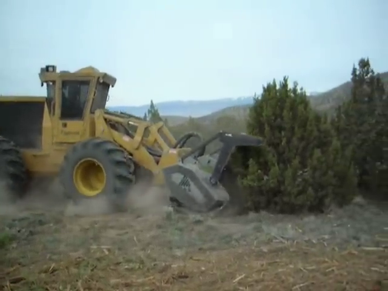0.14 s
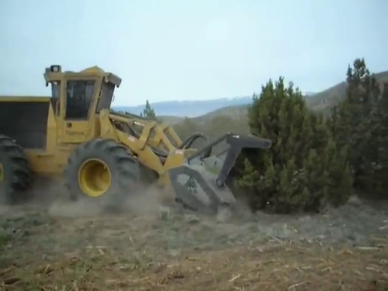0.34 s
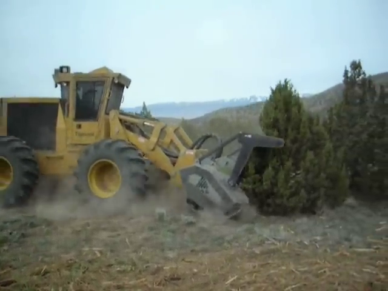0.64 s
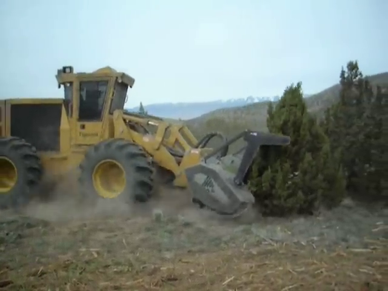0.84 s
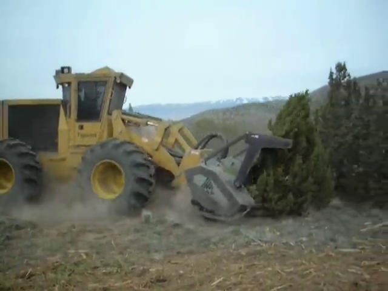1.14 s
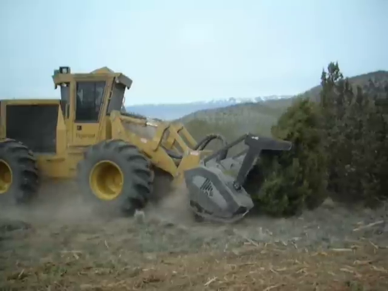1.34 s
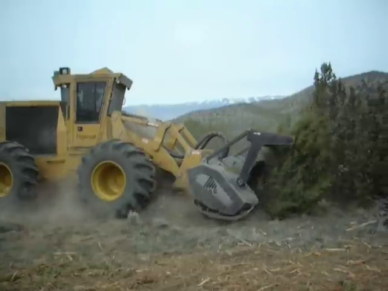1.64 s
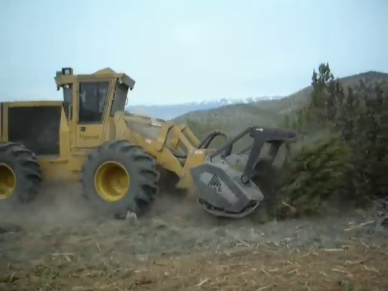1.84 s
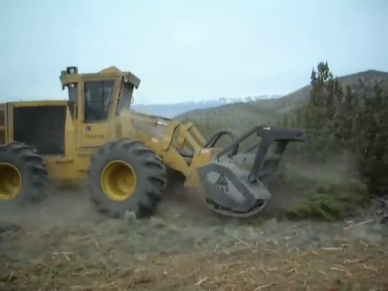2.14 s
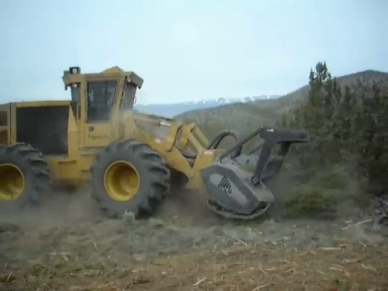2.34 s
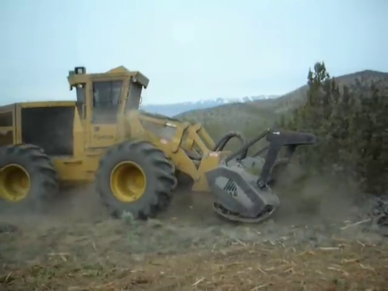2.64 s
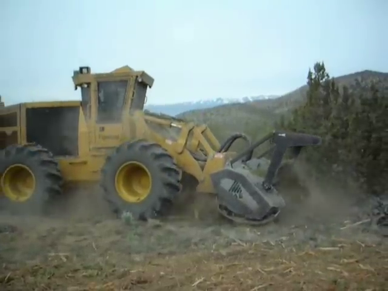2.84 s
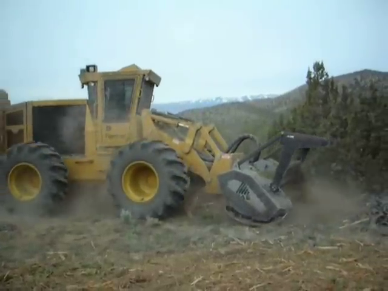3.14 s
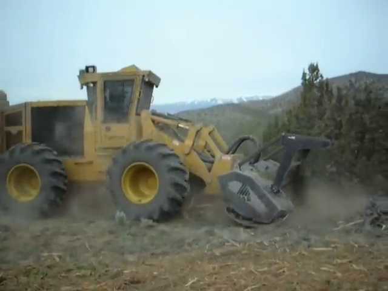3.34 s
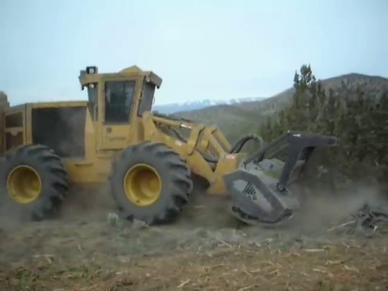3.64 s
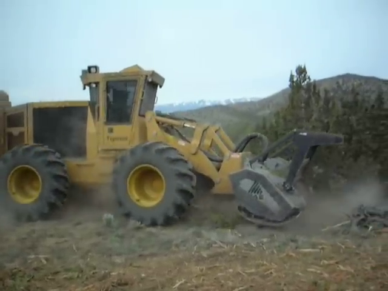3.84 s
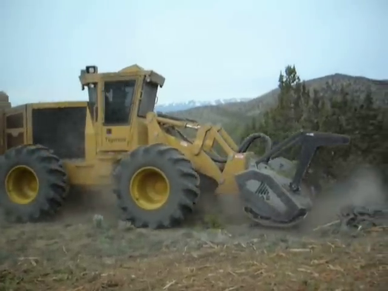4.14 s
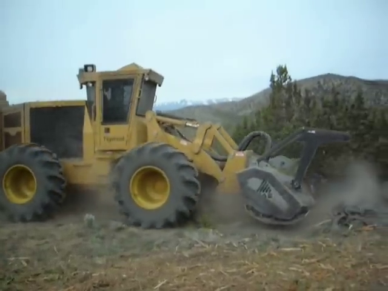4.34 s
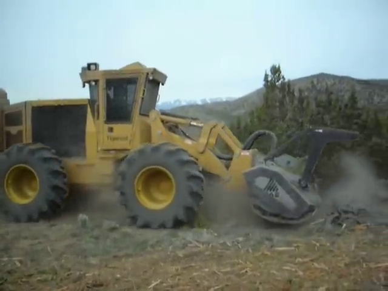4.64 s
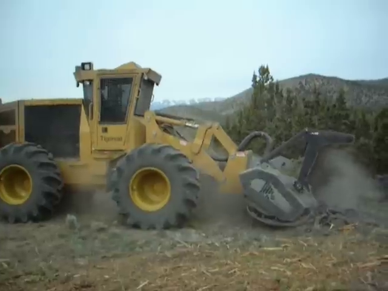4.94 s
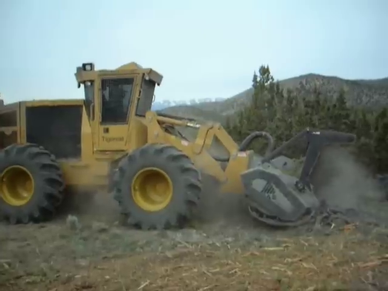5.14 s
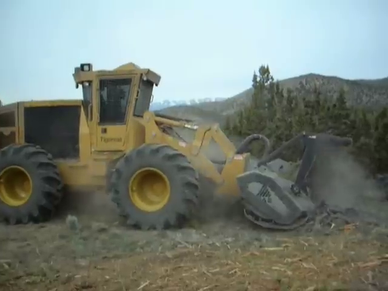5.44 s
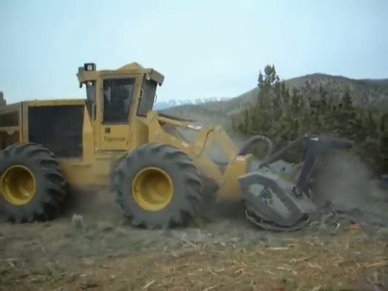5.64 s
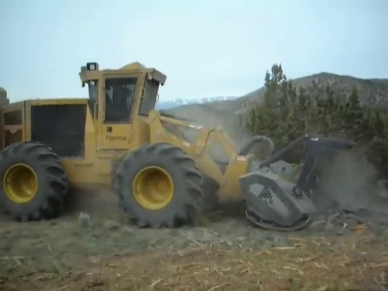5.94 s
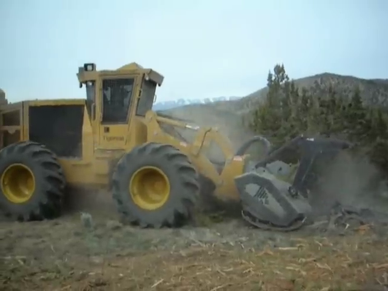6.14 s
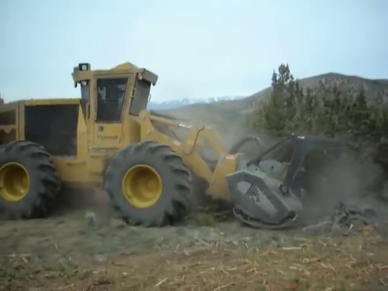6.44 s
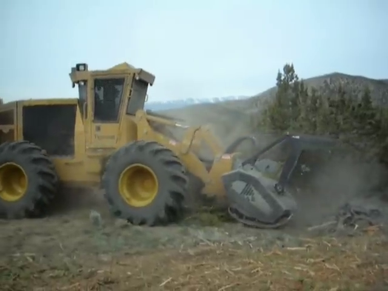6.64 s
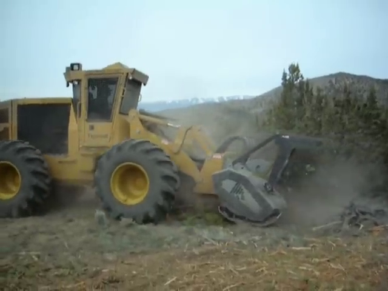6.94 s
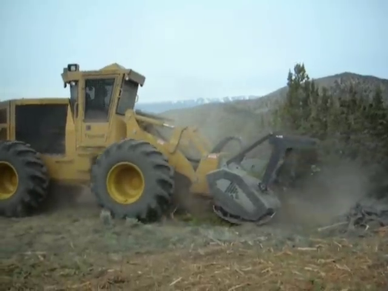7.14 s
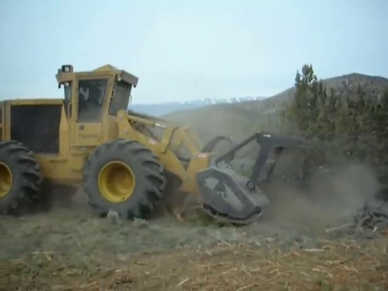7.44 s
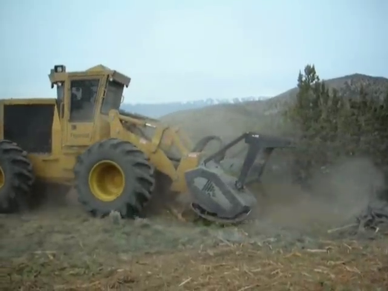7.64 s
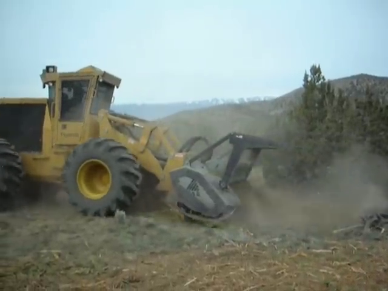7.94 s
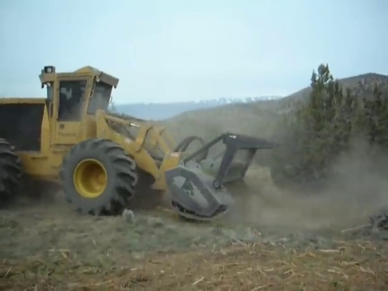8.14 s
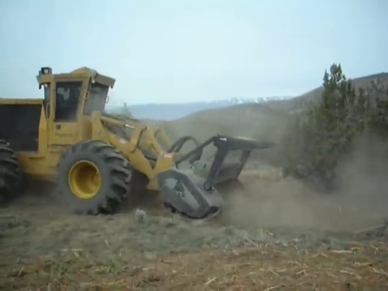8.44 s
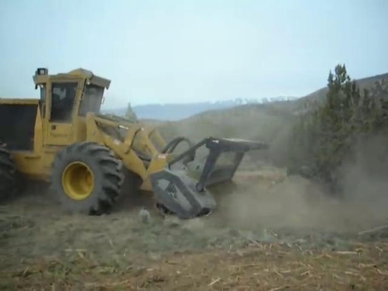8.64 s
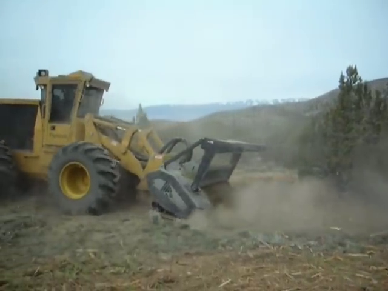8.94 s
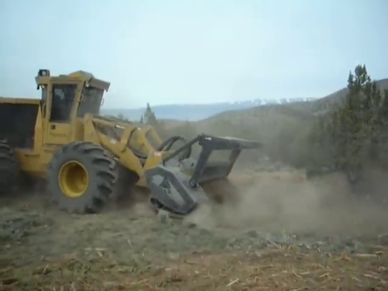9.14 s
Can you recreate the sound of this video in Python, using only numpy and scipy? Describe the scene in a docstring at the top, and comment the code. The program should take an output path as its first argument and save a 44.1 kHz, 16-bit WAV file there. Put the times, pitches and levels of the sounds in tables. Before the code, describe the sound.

A heavy diesel engine drones under load while a mulching drum grinds through brush, with snapping wood and a high whine.

```python
"""A forestry mulcher's toothed drum chews through a juniper bush, then grinds on over the ground.
The teeth tear wood, snap stems and fling chips that ring the steel hood. Behind them a six-cylinder
diesel hums, clatters and sags under load; its fan, the hydraulic pump and a high drive whine follow
the engine speed. It all plays in the open air, heard through a small camera's narrow-band microphone."""
import sys
import numpy as np
from scipy import signal
from scipy.fft import rfft, irfft
from scipy.io import wavfile
from scipy.ndimage import uniform_filter1d

SR = 44100
rng = np.random.default_rng(int(sys.argv[2]) if len(sys.argv) > 2 else 0)


def dump_mix(stems):
    """Bounce the given channels to the path in sys.argv[1] as a 16-bit WAV at rate SR."""
    frames = np.atleast_2d(stems).T  # one column per channel
    limited = np.clip(frames, -1, 1)  # hard clip at full scale
    pcm = np.round(limited * 32767).astype(np.int16)
    wavfile.write(sys.argv[1], SR, pcm)


N = 409248


def undb(db):
    """Decibels to gain."""
    return 10 ** (np.asarray(db) / 20)


def unit(x):
    """Scale to rms 1."""
    return x / np.sqrt(np.mean(x ** 2))


def noise():
    """White noise."""
    return rng.standard_normal(N)


def drift(rate):
    """Smooth random modulation of rms 1, rolling off above rate in Hz."""
    hz = np.arange(1000) * SR / N
    real, imag = rng.standard_normal((2, len(hz)))
    return unit(irfft((real + 1j * imag) * np.exp(-(hz / rate) ** 2), N))


def automation(table):
    """Join (seconds, value) breakpoints into one value a sample."""
    return np.interp(np.arange(N) / SR, *np.transpose(table))


def rides(table, ramp_s):
    """Fader rides in dB, one per level column: ramp in at each start, hold, ramp out at each end."""
    t = np.arange(N) / SR
    step = lambda s: np.clip((t - s) / ramp_s + .5, 0, 1)
    return sum(np.outer(db, step(start) - step(end)) for start, end, *db in table)


def hits(table, rise_s):
    """An envelope that swells to each hit's peak in rise_s and dies away."""
    triggers = np.zeros(N)
    for s, db in table:
        triggers[int(s * SR)] += undb(db)
    age = np.arange(SR // 10) / SR / rise_s
    return signal.fftconvolve(triggers, age * np.exp(1 - age))[:N]


def eq(x, points):
    """Filter by a curve of (Hz, dB) points."""
    hz, db = np.transpose(points)
    bins = np.maximum(np.arange(N // 2 + 1) * SR / N, 1)
    return irfft(rfft(x) * undb(np.interp(np.log(bins), np.log(hz), db)), N)


def ring(x, modes):
    """Parallel resonances of alternating polarity, each filtered twice for steep skirts."""
    out = 0
    for k, (hz, width, db) in enumerate(modes):
        b, a = signal.iirpeak(hz, hz / width, fs=SR)
        out = out + (-1) ** k * undb(db) * signal.lfilter(b, a, signal.lfilter(b, a, x))
    return out


def tone(cycles, flutter_db, wobble, rate):
    """A sine of rms near 1 whose level and phase flutter on the way through the air."""
    level = np.sqrt(2) * undb(flutter_db * drift(rate))
    return level * np.sin(2 * np.pi * cycles + wobble * drift(rate))


def impacts(per_s, spread_db):
    """A spray of random clicks, most of them small."""
    triggers = rng.random(N) < per_s / SR
    return unit(triggers * noise() * undb(spread_db * noise()))


# Engine speed, sagging as the drum bites. Each row: time in seconds, firing rate in Hz.
ENGINE_SPEED = [(0.0, 105.4), (0.08, 105.1), (0.8, 106.5), (1.44, 103.5), (1.76, 98.5), (1.84, 98.24),
                (2.16, 101.5), (2.4, 102.1), (2.56, 101.3), (2.8, 98.64), (2.96, 98.2), (3.28, 102.7),
                (3.6, 102.1), (3.76, 104.9), (4.0, 106.0), (5.04, 106.9), (8.48, 101.7), (9.28, 104.3)]
# How loud the engine comes across. Each row: time in seconds, control level in dB.
ENGINE_LEVEL = [(0.0, -20), (0.4, -22.5), (1.04, -34.5), (1.6, -24), (2.16, -23.5), (2.72, -26.1),
                (2.96, -20), (3.2, -23.5), (4.56, -20.5), (4.88, -23), (5.04, -21.5), (7.28, -23),
                (7.68, -25), (8.4, -23), (8.64, -25), (8.96, -23), (9.2, -24), (9.28, -24)]
# How each part follows the engine. Each entry: base level in dB, dB per engine dB, dB per Hz of sag.
PART_MIX = {"exhaust": (-29.5, 1.1, -0.2), "rumble": (-23, 0.75, 0), "fan": (-29.5, 1.3, -0.86),
            "pump": (-32.5, 0.88, -0.22), "pump_low": (-38, 1, 1.2), "pump_overtones": (-30.5, 1.8, -0.8),
            "whine": (-31.5, 1.3, -1.2), "clatter": (-20.5, 0.44, -0.018), "shred": (-20.5, 0.27, -0.017)}
NO_LOAD_HZ, USUAL_ENGINE_DB = 107, -22

def crankshaft():
    """One shaft drives it all: the running count of firings, the sag in Hz and each part's fader in dB."""
    firing_hz = automation(ENGINE_SPEED)
    firings = np.cumsum(firing_hz) / SR
    sag_hz = NO_LOAD_HZ - firing_hz
    swell_db = automation(ENGINE_LEVEL) - USUAL_ENGINE_DB
    faders = {part: base + follow * swell_db + load * sag_hz
              for part, (base, follow, load) in PART_MIX.items()}
    return firings, sag_hz, faders


FAN_ORDER, PUMP_ORDER, MESH_ORDER = 2.65, 3, 16.775  # cycles per engine firing

def drive_whine(firings, whine_db):
    """The drum drive's gears sing at their mesh rate and, louder, an octave up."""
    mesh = MESH_ORDER * firings
    fundamental = tone(mesh, flutter_db=4, wobble=0.45, rate=12)
    octave = tone(2 * mesh, flutter_db=1, wobble=0.7, rate=24)
    return undb(whine_db - 4) * (undb(-3.5) * fundamental + octave)


def fan(firings, fan_db):
    """The cooling fan drones at its blade rate and the octave, slipping slightly on its belt."""
    blades = FAN_ORDER * firings + .1 * drift(1.6)
    fundamental = tone(blades, flutter_db=3.5, wobble=0.2, rate=23)
    octave = tone(2 * blades, flutter_db=0, wobble=0.98, rate=7.1)
    return undb(fan_db) * (fundamental + undb(-6) * octave)


# The pump's upper partials. Each row: multiple of the piston rate, relative level in dB.
PUMP_PARTIALS = [(3, 0), (4, -13), (5, -15), (8, -8)]
# The hydraulics work harder. Each row: start and end in seconds, then the change in dB of the
# second harmonic, of the fundamental and of the upper partials.
PUMP_EFFORT = [(.03, .33, 5.5, 6, 0), (3.1, 3.45, 5.5, 0.5, -1.5), (3.45, 3.95, 9.5, 2, 2),
               (3.95, 4.7, 5, 5.5, 3), (6.0, 6.78, 8.5, 1, 8), (7.2, 7.85, 5, -3, 5),
               (7.85, 9.1, 4.5, 5.5, 1)]

def hydraulic_pump(firings, song_db, low_db, upper_db):
    """The piston pump sings out as it works, mostly on its second harmonic."""
    song_ride, low_ride, upper_ride = rides(PUMP_EFFORT, ramp_s=0.098)
    pistons = PUMP_ORDER * firings
    low = undb(low_db + low_ride + 0.5) * tone(pistons, flutter_db=3, wobble=0.31, rate=9.6)
    song = undb(song_db + song_ride + 2) * tone(2 * pistons, flutter_db=1.2, wobble=0.2, rate=8)
    upper = sum(undb(db) * tone(k * pistons, flutter_db=1.8, wobble=0.4, rate=9)
                for k, db in PUMP_PARTIALS)
    return low + song + undb(upper_db + upper_ride - 1) * upper


# The exhaust's hum. Each row: multiple of the firing rate, relative level in dB.
EXHAUST_PARTIALS = [(1, -3.5), (2, -1), (4, -30.5), (5, -30.5)]
# The uneven firing. Each entry: one cylinder's strength in dB.
CYLINDER_DB = [4, 1, 0.5, 3, -1, 3]
# The exhaust's low-mid body. Each row: frequency in Hz, gain in dB.
RUMBLE_EQ = [(25, -38.5), (45, -36.5), (62, -31), (85, -19.5), (130, -11), (180, -6.5), (250, -1), (320, 0),
             (420, -2.5), (520, -5), (700, -13.5), (1200, -48)]
SIDE_ON = (5.46, 7.52, 3)  # the machine, side-on, hums louder: start and end in seconds, lift in dB

def diesel(firings, sag_hz, exhaust_db, rumble_db):
    """The exhaust hums at the firing rate; unequal cylinders growl harder as load drags the speed down."""
    side_db, = rides([SIDE_ON], ramp_s=0.5)
    hum = sum(undb(db) * tone(k * firings, flutter_db=0.94, wobble=0.11, rate=6)
              for k, db in EXHAUST_PARTIALS)
    count = firings.astype(int)
    imbalance = undb(CYLINDER_DB) - np.mean(undb(CYLINDER_DB))
    pulses = np.diff(count, prepend=0) * imbalance[count % len(CYLINDER_DB)]
    growl = unit(eq(pulses * (1 + .4 * noise()), RUMBLE_EQ)) * undb(.5 * sag_hz - 10)
    gas = unit(eq(noise(), RUMBLE_EQ)) * undb(drift(25) - 3)
    return hum * undb(exhaust_db + side_db) + undb(rumble_db) * (growl + gas)


def knock(firings):
    """Injectors and valve gear tick the same uneven pattern in every cycle of six firings."""
    pattern = rng.standard_normal(2400)
    position = firings / len(CYLINDER_DB) % 1 * len(pattern)
    return np.interp(position, np.arange(len(pattern)), pattern)


# The midrange ring of block and housings. Each row: frequency in Hz, gain in dB.
CLATTER_EQ = [(300, -41.5), (520, -5), (660, 2), (860, 4), (1050, 0), (1300, -4), (1600, -5), (2400, -49.5)]

def clatter(firings, clatter_db):
    """Block and housings ring with knock and grit, pulsing with the firings and the pump pistons."""
    pulse = 1 + 0.15 * np.cos(2 * np.pi * firings) + 0.18 * np.cos(2 * np.pi * PUMP_ORDER * firings)
    strikes = impacts(per_s=12000, spread_db=2) + undb(-5.5) * knock(firings)
    return undb(clatter_db + 0.75) * unit(eq(pulse * strikes, CLATTER_EQ))


# The steel hood's modes. Each row: frequency in Hz, filter width in Hz, gain in dB.
HOOD_MODES = [(1530, 190, -7), (1660, 170, 0), (1750, 140, -.5)]

def hood(strikes):
    """The steel hood rings under whatever strikes it, at rms 1."""
    return unit(ring(strikes, HOOD_MODES))


# The bright colour of a snap. Each row: frequency in Hz, gain in dB.
SNAP_EQ = [(200, -20.5), (700, -4.5), (1300, -1), (1750, 4), (2600, 3), (3300, 2), (4000, -8),
           (4600, -25.5)]
SPLINTER_PEAK_S, SPLINTER_HALF_LENGTH_S, SPLINTER_DB = 1.0, 0.39, -26.5
SPLINTERS_PER_S, SPLINTER_DECAY_S = 100, 0.0013

def splinters():
    """Twigs break in a dry run of tiny snaps while the bush is pushed over."""
    breaks = (rng.random(N) < SPLINTERS_PER_S / SR) * undb(1.8 * noise())
    bursts = signal.lfilter([1], [1, -np.exp(-1 / (SPLINTER_DECAY_S * SR))], breaks)
    felling = np.exp(-((np.arange(N) / SR - SPLINTER_PEAK_S) / SPLINTER_HALF_LENGTH_S) ** 2)
    return undb(SPLINTER_DB) * felling * unit(eq(bursts * noise(), SNAP_EQ))


# Short sharp cracks: snapping wood, plus a few brief peaks heard as ticks (2.70, 4.064 and 6.92 s).
# Each row: start in seconds, relative peak in dB.
CRACK_CUES = [(.7515, -7), (.7625, -10), (.8245, -6.5), (.8809, -7), (.9073, -7.5), (.9235, -8.5),
              (.940, -8), (.955, -9), (.9845, -3.5), (1.0145, -5.5), (1.031, -10), (1.128, -10),
              (1.917, -6.5), (1.937, -11), (2.0004, -12), (2.258, -1), (2.373, -4.5), (2.459, -4),
              (2.70, -4.5), (3.0165, -6.5), (4.064, -4.5), (5.225, -6), (5.478, -4), (6.92, -6.5),
              (7.528, -5.5), (7.615, -5), (7.9099, -10.5), (8.1818, -9), (8.4103, -7), (9.117, -6)]

def cracks():
    """Wood snaps and sharp ticks: a bright burst of a few milliseconds with a faint ring of the hood."""
    snap = hits(CRACK_CUES, rise_s=0.0011) * unit(eq(noise(), SNAP_EQ))
    low_cut = signal.butter(2, 400, "high", fs=SR, output="sos")  # keeps the cracks thin
    clank = hits(CRACK_CUES, rise_s=0.006) * hood(noise())
    return undb(-3.5) * signal.sosfilt(low_cut, snap) + undb(-21) * clank


# Heavy chunks of wood hit the housing. Each row: start in seconds, relative peak in dB.
THUMP_CUES = [(1.132, -17), (7.825, -17), (9.095, -9.5), (9.118, -13)]
# The heavy frame's modes. Each row: frequency in Hz, filter width in Hz, gain in dB.
FRAME_MODES = [(490, 86, -10), (686, 170, 6.5), (925, 280, -2.5)]

def thumps():
    """Thick pieces of wood knock a short, dull note out of the housing's frame."""
    return undb(0.5) * hits(THUMP_CUES, rise_s=0.0037) * unit(ring(noise(), FRAME_MODES))


# The drum works through brush and throws more chips. Each row: start and end in seconds, lift in dB.
BRUSH_PASSES = [(.25, 1.2, 4.5), (1.2, 2.1, 8.5), (2.1, 3.05, 9), (3.05, 3.7, 7), (6.7, 7.45, 6.5),
                (7.45, 8.15, 10), (8.15, 8.75, 12), (8.75, 9.5, 9)]
# The drum scrapes up grit or lifts clear for a moment. Each row: start and end in seconds,
# change of the clatter in dB, change of the shredding in dB.
GROUND_SCRAPES = [(-.1, .42, 1, 0.5), (.56, .7, -2, -1.5), (1.2, 1.5, 3, 0.8), (2.82, 3.05, 1, 0),
                  (3.74, 5.45, 1.3, 1.5), (5.45, 6.9, 2, 1.6), (6.92, 7.12, -0.5, -1.5),
                  (7.27, 7.57, 1.5, 2.5)]
BARE_SWING_DB, SWING_PER_BRUSH_DB = 0.31, 0.1084

def drum_feed():
    """What the teeth meet: dB rides for brush and ground, and a bite gain that swings more in brush."""
    brush_db, = rides(BRUSH_PASSES, ramp_s=0.29)
    grit_db, scrape_db = rides(GROUND_SCRAPES, ramp_s=0.077)
    bite = undb((BARE_SWING_DB + SWING_PER_BRUSH_DB * brush_db) * drift(37))
    return brush_db, grit_db, scrape_db, bite


# The rasp of tearing wood. Each row: frequency in Hz, gain in dB.
SHRED_EQ = [(500, -36.5), (1300, -9.5), (1950, -1), (2300, 1), (2650, 1.5), (3150, -0.5), (3500, -5),
            (4000, -14.5), (4400, -22.5), (5000, -22.5)]
BARE_HOOD_DB = -29.5  # the hood's level over bare ground

def drum(brush_db, shred_db, bite):
    """Teeth tear wood in uneven bites, and the chips they throw ring the hood."""
    tearing = unit(eq(impacts(per_s=12000, spread_db=0), SHRED_EQ))
    chips = hood(impacts(per_s=2600, spread_db=1))
    return bite * undb(shred_db + 0.63) * tearing + np.sqrt(bite) * undb(BARE_HOOD_DB + brush_db) * chips


def scene():
    """The mono mix: a bed of engine and hydraulics, with the grinding drum and sharp accents on top."""
    firings, sag_hz, db = crankshaft()
    brush_db, grit_db, scrape_db, bite = drum_feed()
    engine = diesel(firings, sag_hz, db["exhaust"], db["rumble"]) + fan(firings, db["fan"])
    pump = hydraulic_pump(firings, db["pump"], db["pump_low"], db["pump_overtones"])
    grinding = drum(brush_db, db["shred"] + scrape_db, bite)
    rattle = np.sqrt(bite) * clatter(firings, db["clatter"] + grit_db)
    whine = drive_whine(firings, db["whine"])
    accents = cracks() + thumps() + splinters()
    return (engine + pump + whine + rattle + grinding + accents)[None]


def limiter(x, threshold_db, recovery_db_per_s):
    """Gain drops at once when the 3 ms level passes the threshold, then recovers steadily."""
    power = uniform_filter1d(x ** 2, int(.003 * SR))
    level_db = 10 * np.log10(np.maximum(power, 1e-9))
    over_db = np.maximum(level_db - threshold_db, 0)
    recovery = recovery_db_per_s * np.arange(N) / SR
    cut_db = np.maximum.accumulate(over_db + recovery) - recovery
    return x * undb(-cut_db)


# The camera microphone's narrow band. Each row: frequency in Hz, gain in dB.
MIC_EQ = [(3500, 0), (4000, -3), (4350, -11), (4520, -28), (4700, -70), (5000, -90)]
SOFT_CEILING, HARD_CEILING, HIGH_CUT_HZ = 0.72, 0.71, 15800

def record(dry):
    """The camera ducks and rounds loud peaks and keeps a narrow band; any overshoot clips faintly."""
    held = limiter(dry, threshold_db=-7.5, recovery_db_per_s=130)
    rounded = held / (1 + (held / SOFT_CEILING) ** 8) ** (1 / 8)
    clipped = np.clip(eq(rounded, MIC_EQ), -HARD_CEILING, HARD_CEILING)
    high_cut = signal.ellip(8, .2, 70, HIGH_CUT_HZ, fs=SR, output="sos")
    return signal.sosfilt(high_cut, clipped)


dry = scene()
out = record(dry)
dump_mix(out)
```